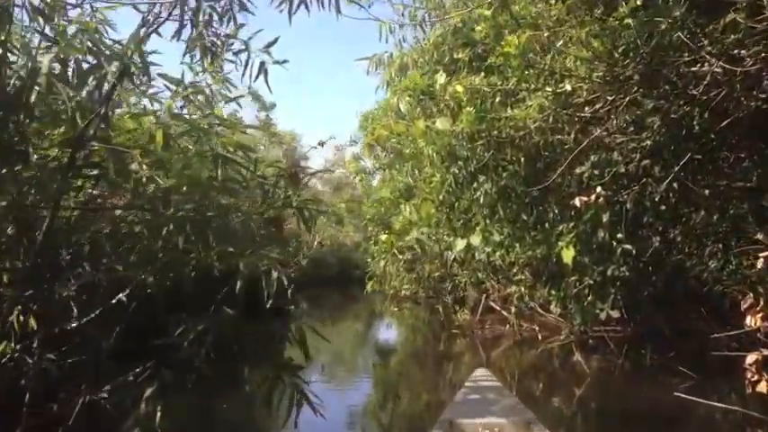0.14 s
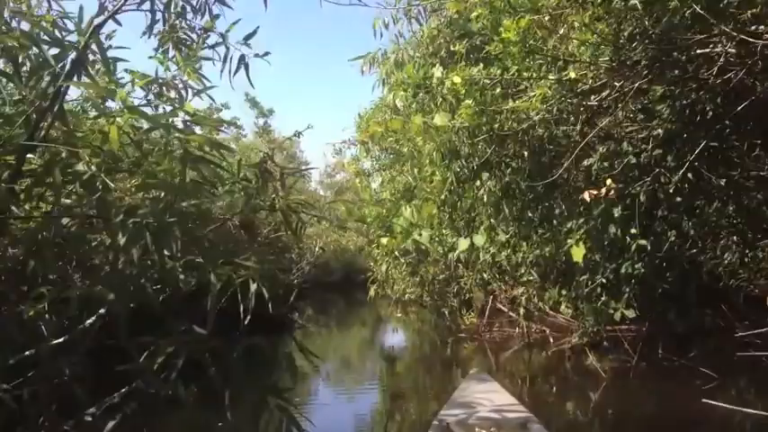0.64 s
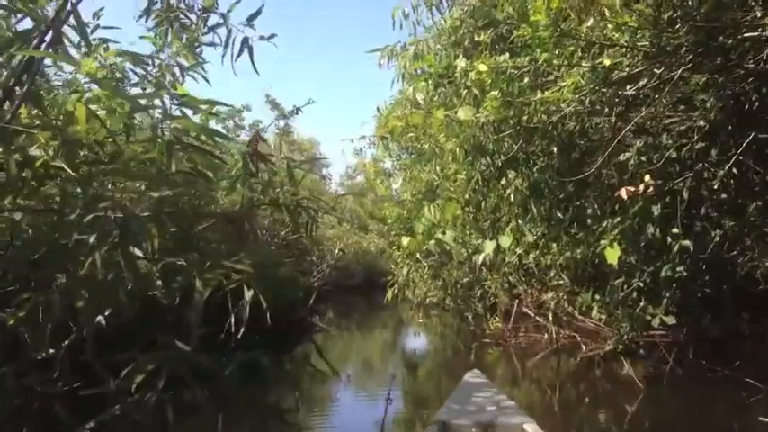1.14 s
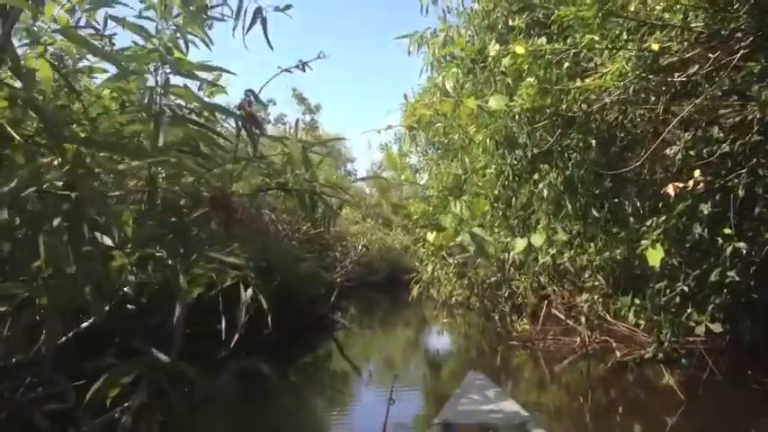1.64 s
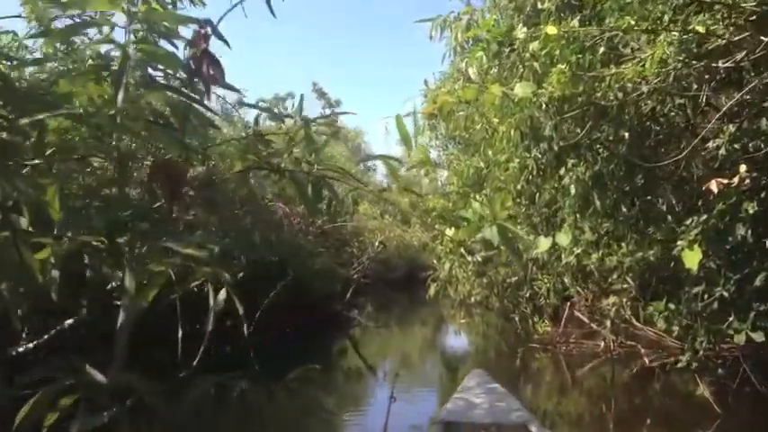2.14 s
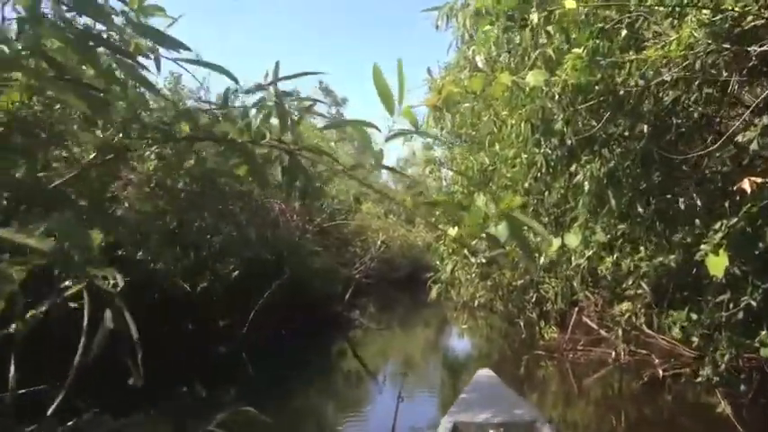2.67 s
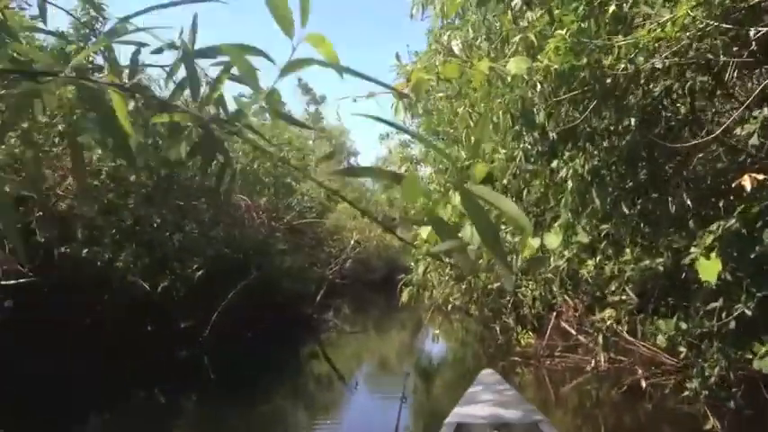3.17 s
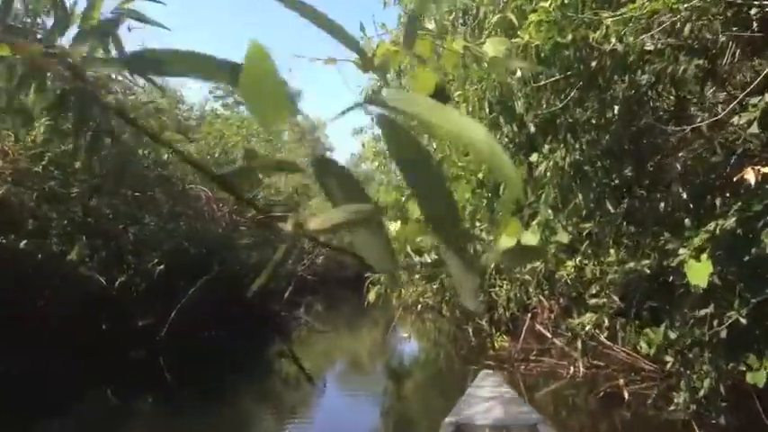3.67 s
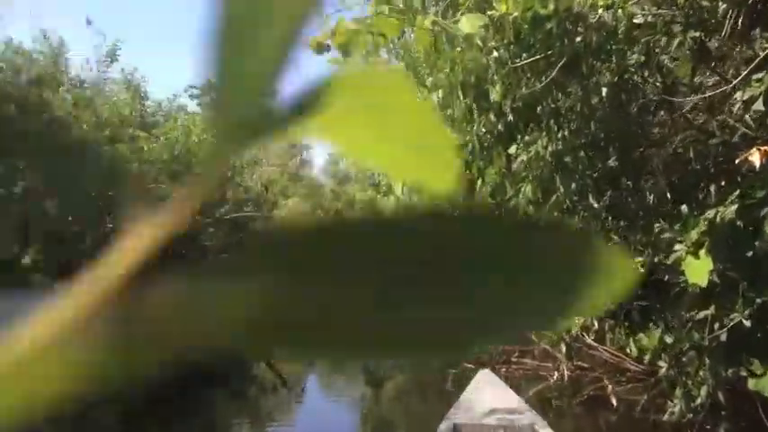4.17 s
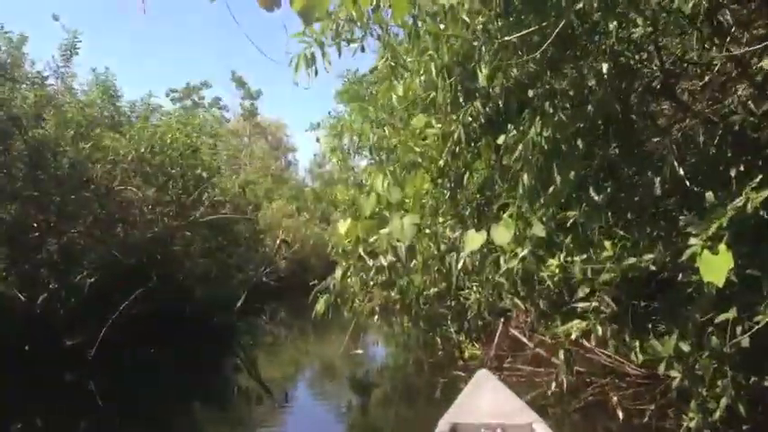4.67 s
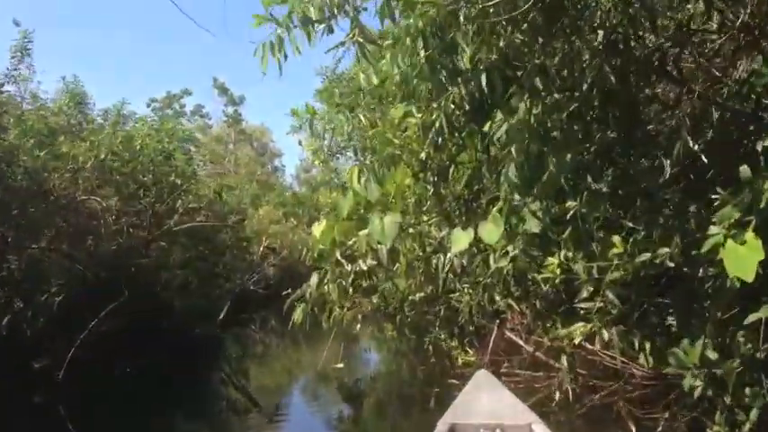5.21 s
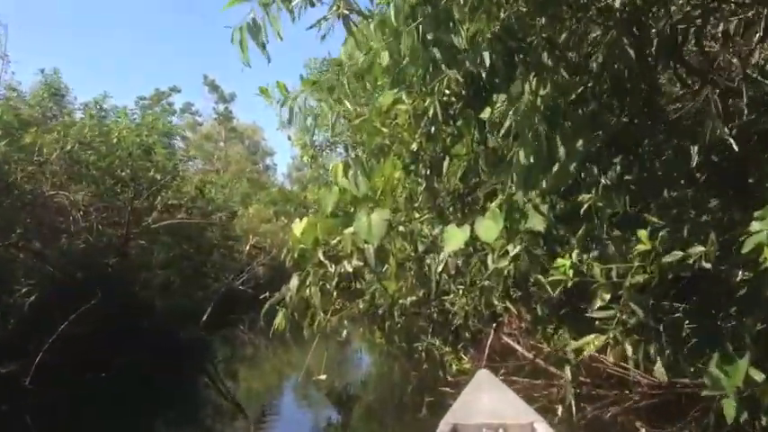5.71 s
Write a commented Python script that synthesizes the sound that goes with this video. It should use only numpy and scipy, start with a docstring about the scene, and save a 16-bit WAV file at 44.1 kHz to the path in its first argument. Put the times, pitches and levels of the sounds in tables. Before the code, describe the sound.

Quiet outdoor paddling on a calm creek, heard close through a small camera microphone with steady faint hiss and a soft low hull hum. A brief gurgle opens, then from 0.2 to 1.4 seconds short round drips and plops scatter, with tiny dry ticks and thin trickling. It calms until about 2.1, when a brighter cluster of plops and leaf ticks bursts at 2.3, followed by draining bubbles, soft hull bumps near 2.6 and fuller gurgling around 2.9. Water thins after 3.4. At 3.75 the paddle gives a hollow woody knock with a short low ring. Twigs scrape at 4.1, then at 4.33 a leafy branch slaps the camera: a very loud abrupt thump and crack with a few smaller flicks, over within 50 milliseconds. Rustling and lively plops follow at 4.5 and 4.9, a soft bump near 5, then fading trickle and light leaf brushing to the end.

```python
"""Water gurgles, trickles and drips round a canoe paddle over a low hull hum: swarms of gliding sine bubbles.
Foliage rustles along the boat and the hull hums: shaped noise, over two faint low drones.
Twigs tick and drag: noise bursts through resonances. Wooded banks return a short dull tail.
The paddle knocks the hull among softer bumps, and a leafy branch slaps the camera: damped modes and noise.
The camera adds a steady hiss."""
import sys
import numpy as np
from scipy import signal
from scipy.fft import rfft, irfft, next_fast_len
from scipy.io import wavfile
from scipy.ndimage import map_coordinates

SR = 44100
rng = np.random.default_rng(int(sys.argv[2]) if len(sys.argv) > 2 else 0)


def wav_out(sig):
    """Save sig, one row per channel (or a flat mono array), as 16-bit PCM at SR to the path in sys.argv[1]."""
    wavfile.write(sys.argv[1], SR, np.round(np.clip(np.atleast_2d(sig).T, -1, 1) * 32767).astype(np.int16))


def ratio(d):
    """dB to gain"""
    e = np.asarray(d, float) / 20
    return 10 ** e


N = 257103

# large bubbles swirling round the blade: t/s, level/dB
GURGLE_LEVEL = [(0.0, -53.5), (0.11, -80), (0.33, -69.5), (1.1, -69.5), (1.3, -80), (1.65, -68.5),
                (2.1, -81.5), (2.31, -62), (2.5, -68), (2.88, -59), (3.41, -63.5), (3.7, -73),
                (4.18, -76.5), (4.6, -56.5), (4.76, -64), (5.02, -57.5), (5.2, -72), (5.83, -71)]
# water draining off blade and hull: t/s, level/dB
TRICKLE_LEVEL = [(0.0, -72.5), (0.15, -63.5), (0.5, -69.5), (0.69, -59), (0.88, -69.5), (1.1, -59.5),
                 (1.65, -67), (2.08, -74.5), (2.31, -63), (2.53, -72.5), (2.64, -61), (2.75, -68),
                 (2.95, -55), (3.08, -63.5), (3.41, -61), (3.63, -72), (4.29, -70), (4.4, -53.5),
                 (4.73, -64.5), (4.96, -57.5), (5.2, -65.5), (5.4, -71.5), (5.83, -64.5)]
# single bubbles and drops: t/s, peak/dB, f at the peak/Hz, length/cycles
DROPS = [(0.199, -39.5, 2320, 10.7), (0.312, -50, 2400, 5.6), (0.338, -53.5, 4490, 15),
         (0.349, -38, 1790, 6.1), (0.372, -50.5, 322, 6.1), (0.373, -35.5, 1680, 4.5),
         (0.382, -41, 1350, 6.9), (0.413, -52, 7240, 12), (0.555, -53, 645, 8.5), (0.653, -38, 1150, 6.7),
         (0.724, -46.5, 1380, 8.3), (0.74, -49, 2070, 6.8), (0.757, -42.5, 2200, 6.5),
         (0.775, -50, 2720, 12), (0.803, -50, 2120, 9.6), (0.872, -50, 1830, 9.5),
         (0.994, -38.5, 2440, 7.8), (1.04, -51, 894, 18.5), (1.071, -45.5, 877, 11),
         (1.086, -44, 1270, 10.5), (1.165, -49, 1480, 9.4), (1.239, -45, 1840, 4.4), (1.28, -50, 7900, 13),
         (1.395, -48.5, 2300, 13), (2.145, -45, 5300, 12), (2.169, -48.5, 4000, 7.5),
         (2.175, -47, 2020, 11), (2.262, -43, 2200, 5.4), (2.268, -30, 1970, 3.8), (2.31, -43.5, 5630, 9.7),
         (2.339, -29, 1894, 8.4), (2.341, -37, 1386, 8.3), (2.34, -45.5, 3930, 38), (2.37, -49, 3580, 18),
         (2.391, -49, 1760, 12), (2.436, -45, 1143, 13.7), (2.538, -42.5, 3900, 9.5),
         (2.651, -32.5, 2190, 5.7), (2.67, -38.5, 1380, 6.5), (2.676, -42, 2240, 14),
         (2.691, -48, 2480, 18), (2.766, -52, 812, 14), (2.852, -46, 408, 9), (2.877, -50, 1190, 11),
         (2.897, -42.5, 2740, 8.1), (2.931, -37, 1630, 4.3), (2.971, -46.5, 3400, 9.2),
         (2.987, -50, 440, 7.4), (3.12, -47.5, 810, 7.3), (3.182, -52, 2140, 11), (3.266, -53.5, 338, 7.6),
         (3.467, -52.5, 1300, 10.6), (3.476, -54, 303, 6), (4.124, -48, 1220, 8.4),
         (4.129, -45.5, 2520, 11.5), (4.405, -45.5, 3260, 12), (4.473, -44.5, 1200, 10.7),
         (4.516, -33, 1390, 5.8), (4.527, -37, 920, 6.3), (4.545, -37, 1540, 11), (4.546, -35, 2450, 7.6),
         (4.577, -46.5, 1640, 13), (4.577, -44, 695, 14.5), (4.6, -52, 656, 12.7), (4.635, -51, 597, 12),
         (4.663, -45, 1770, 10), (4.755, -49.5, 201, 4.9), (4.864, -29.5, 1160, 3),
         (4.8645, -38, 2240, 7.2), (4.898, -44.5, 2340, 17), (4.951, -45, 1223, 10), (4.993, -48, 2520, 10),
         (5.01, -46.5, 912, 18.6), (5.025, -46, 2080, 16), (5.027, -43.5, 1250, 11), (5.051, -47, 1740, 10)]
# scattered drips: level re trickle, median pitch, its spread, median length
DRIP_DB, DRIP_HZ, DRIP_OCTAVES, DRIP_CYCLES = -6.5, 2188, 0.9, 10
# echo decay off the wooded banks: f/Hz, t60/s
BANK_DECAY = [(300, 0.037), (2000, 0.067), (10000, 0.037)]
# hum of the hull: t/s, level/dB
HUM_LEVEL = [(0.0, -55.5), (0.25, -59), (0.8, -64.5), (1.8, -65), (2.4, -59), (3.2, -62), (3.6, -67),
             (4.15, -57.5), (4.5, -63), (5.83, -63.5)]
# hum spectrum: f/Hz, density/dB
HUM_SPECTRUM = [(13, -60), (22, -27), (27, -2), (40, -9), (54, 2), (107, 0), (187, -11.5), (209, -23.5),
                (300, -22.5), (390, -46), (660, -120)]
# paddle and water bumping the hull: t/s, level/dB
KNOCKS = [(0.291, -47.5), (1.915, -52), (2.094, -47), (2.606, -42.5), (2.633, -43.5), (2.67, -44),
          (3.744, -36), (3.7496, -31.5), (3.772, -38), (3.809, -39), (3.866, -54), (4.985, -46)]
# low hull modes: f/Hz, level/dB, t60/s
HULL_MODES = [(85, 7.5, 0.043), (117.2, -4, 0.32), (175.5, -9, 0.17), (201.7, 2.5, 0.078), (319, 0, 0.078),
              (430, 6, 0.019)]
# dense upper hull modes: f/Hz, density/dB
PLANK_SPECTRUM = [(200, -20), (400, 3.5), (1000, 5), (1700, 2), (2350, 0.5), (2700, -9), (4500, -19),
                  (8000, -26), (15000, -47)]
# decay of the upper hull modes: f/Hz, t60/s
PLANK_DECAY = [(300, 0.19), (1000, 0.054), (2500, 0.11), (8000, 0.064)]
# extra hum after each bump: level re bump, decay
AFTER_HUM_DB, AFTER_HUM_T60_S = -14, 0.38
# foliage brushing along the boat: t/s, level/dB
RUSTLE_LEVEL = [(0.0, -64), (0.11, -75.5), (0.5, -74), (1.05, -68.5), (1.45, -70.5), (2.0, -75),
                (2.2, -68.5), (3.0, -68.5), (3.41, -68.5), (3.6, -76), (4.18, -75), (4.44, -58.5),
                (4.73, -69), (4.9, -61.5), (5.39, -72), (5.55, -62.5), (5.75, -77)]
# foliage spectrum: f/Hz, density/dB
BRUSH_SPECTRUM = [(500, -2), (1200, -31), (2300, -0.5), (4000, 2), (7000, -5), (11000, -10.5), (15200, -15),
                  (15500, -62)]
# steady low drone: f/Hz, width/Hz, level/dB
DRONE_TONES = [(59.3, 9, -68), (116.8, 9, -73.5)]
# twig and leaf snaps: t/s, body peak/dB, bright peak re body/dB, t60/s
SNAPS = [(.349, -40.5, -32, 0.013), (0.389, -56, -24, .005), (.412, -43, -20, 0.01),
         (.759, -39, -28, 0.0061), (.778, -51, -1, 0.011), (1.069, -40.5, -23, 0.015),
         (2.143, -50.5, 5, 0.012), (2.151, -55.5, 14.5, 0.014), (2.261, -37.5, -11, 0.04),
         (2.269, -26, 2, 0.0082), (2.342, -32.5, -21, 0.0067), (2.539, -47, 2.5, 0.011),
         (2.676, -40, -21, 0.014), (2.684, -35.5, -21, 0.0077), (2.929, -43.5, -24, 0.016),
         (3.184, -40.5, -15, 0.016), (4.124, -41, -1, 0.04), (4.28, -49.5, 8.5, .006),
         (4.458, -50, 5, 0.0073), (4.517, -35.5, -10, 0.012), (4.547, -40, -23, .01),
         (4.865, -33.5, -29, 0.013), (5.029, -42, -18, .01), (5.104, -47, -14, 0.01),
         (5.163, -44, -5.5, .006), (5.516, -49.5, -1, 0.044)]
# leaves dragged past: t/s, body level/dB, bright level re body/dB, hold/s, t60/s
DRAGS = [(2.265, -52.5, -1.5, 0.022, 0.24), (2.336, -53, -7, 0.015, 0.2), (2.688, -57, -6, 0.017, 0.05),
         (4.128, -55, -12, 0.022, 0.19), (0.361, -63.5, -31, 0.035, 0.044), (0.701, -60, -24, 0.11, 0.056),
         (1.071, -54, -23, 0.027, 0.043), (4.34, -45, -12, 0.029, 0.014), (4.405, -44.5, -19, 0.023, .02),
         (4.464, -59, -2, 0.016, .04), (4.517, -45, -16, 0.033, 0.11), (4.865, -54, -26, 0.0078, 0.16),
         (4.945, -59.5, -4, 0.019, 0.058), (4.976, -55, -8, 0.075, 0.071), (4.757, -68.5, 5.5, 0.038, 0.1),
         (5.105, -51, -26, 0.011, 0.023)]
# twig resonances: f/Hz, width/Hz, level/dB
TWIG_MODES = [(750, 590, -7.5), (1350, 860, -7.5), (2020, 390, -2.5), (3600, 3200, -16.5)]
# branch on the camera: t/s, push level/dB, port ring level/dB, crack level/dB
SLAPS = [(4.322, -36, -60, -46), (4.332, -7, -8, -22.5), (4.339, -25, -50, -44), (4.3478, -14, -36, -28),
         (4.3534, -16.5, -50, -32.5), (4.361, -30, -54, -35), (4.366, -35, -51, -40)]
# body of the camera: f/Hz, level/dB, t60/s
CASE_MODES = [(115, -2.5, 0.051), (183, 6, 0.019), (260, 4.5, 0.028), (345, 3.5, 0.027), (410, 0.5, 0.023),
              (635, -7, 0.043), (830, -6.5, 0.029)]
# microphone port: f/Hz, level/dB, t60 ahead of the swell factor/s
PORT_MODES = [(2030, 2, 0.0085), (3200, -4, 0.0039)]
# crack of the slap: f/Hz, density/dB
CRACK_SPECTRUM = [(500, 1.5), (1300, 5), (3000, 2), (5800, -4), (8000, -10.5), (15000, -16), (17000, -42)]
# camera hiss: f/Hz, density/dB
HISS_SPECTRUM = [(120, -21), (200, 6.5), (304, -8.5), (487, 2.5), (1400, -5.5), (2100, -7.5), (3000, -12),
                 (7000, -11.5), (14200, -13), (15200, -12), (15500, -74)]
HISS_DB = -66


def unit(x):
    """Scaled to rms 1."""
    return x / np.sqrt(np.mean(x ** 2) + 1e-20)


def along(points, hz):
    """Interpolates (f/Hz, value) points on a log-frequency axis."""
    f, v = np.transpose(points)
    return np.interp(np.log(hz + 1), np.log(f + 1), v)


def curve(points):
    """Interpolates (t/s, value) points to one value per sample."""
    s, v = np.transpose(points)
    return np.interp(np.arange(N) / SR, s, v)


def wobble(rate_hz):
    """Smooth random curve with rate_hz knots a second."""
    knots = rng.standard_normal(int(N * rate_hz / SR) + 4)
    return map_coordinates(knots, [np.arange(N) * rate_hz / SR])


def filtered(x, response):
    """x times a complex response of frequency."""
    m = next_fast_len(len(x) + 8192)
    return irfft(rfft(x, m) * response(np.fft.rfftfreq(m, 1 / SR)), m)[:len(x)]


def shaped(x, spectrum):
    """x coloured by a (f/Hz, dB) curve."""
    return filtered(x, lambda hz: ratio(along(spectrum, hz)))


def noise(spectrum):
    """Coloured noise of rms 1."""
    return unit(shaped(rng.standard_normal(N), spectrum))


def add(track, s, sound):
    """Mixes a sound into the track at s seconds."""
    part = track[round(s * SR):][:len(sound)]
    part += sound[:len(part)]


def ring(modes, t, scatter_db):
    """Damped sine modes, each struck at a slightly random level."""
    out = 0
    for hz, db, t60 in modes:
        level_db = db + scatter_db * rng.normal() - 60 * t / t60
        out = out + ratio(level_db) * np.sin(2 * np.pi * hz * t)
    return out


def dying(decays, size):
    """Noise burst whose bands fade at their own speed, energy 1."""
    hz, t, z = signal.stft(rng.standard_normal(size), SR, nperseg=128)
    fade = ratio(-60 * t / along(decays, hz)[:, None])
    tail = signal.istft(z * fade, SR, nperseg=128)[1]
    return tail / np.linalg.norm(tail)


def bubbles(s, db, hz, cycles, rise, size):
    """Air pockets: soft start, quick death, pitch climbing as they near the surface."""
    t = np.arange(size) / SR
    u = 2.38 * t * (hz / cycles)[:, None]  # envelope peaks at u = 1
    turns = hz[:, None] * t * (1 + rise * (u / 2 - 1))
    envelope = (u * np.exp(1 - u)) ** 1.44
    rows = ratio(db)[:, None] * envelope * np.sin(2 * np.pi * turns)
    at = np.round(s * SR).astype(int)[:, None] + np.arange(size)
    return np.bincount(at.ravel(), rows.ravel(), N + size + SR)[:N]


def swarm(centre_hz, octaves, cycles, spread_db, count, size):
    """Many bubbles of random time, pitch, length and level, rms 1."""
    s = rng.random(count) * N / SR
    hz = centre_hz * 2 ** (octaves * rng.normal(size=count))
    life = cycles * 1.3 ** rng.normal(size=count)
    db = spread_db * np.minimum(rng.exponential(size=count), 3)
    return unit(bubbles(s, db, hz, life, 0.056, size))


def drops_and_spray():
    """Single drops, each breaking into four weaker pockets of nearby pitch just after it."""
    s, db, hz, cycles = np.transpose(DROPS)
    drops = bubbles(s, db, hz, cycles, 0.016, size=4000)
    later, apart, weaker = rng.random((3, len(s), 4))
    spray_s = s[:, None] + 1.5 * later * (cycles / hz)[:, None]
    spray_db = db[:, None] - 7.5 - 8 * weaker
    spray_hz = hz[:, None] * 2 ** (0.82 * apart - 0.35)
    spray_cycles = np.repeat(0.5 * cycles, 4)
    spray = bubbles(spray_s.ravel(), spray_db.ravel(), spray_hz.ravel(), spray_cycles, 0.027, size=2500)
    return drops + spray


def water(gurgle_db, trickle_db):
    """Large bubbles at the blade, small ones where it drains, scattered drips and single drops."""
    gurgle = ratio(gurgle_db) * swarm(520.6, 0.449, 5.96, 1.86, count=2500, size=1800)
    trickle = ratio(trickle_db + 3.17 * wobble(45)) * swarm(1692, 0.558, 6.5, 3.2, count=7000, size=600)
    drips = swarm(DRIP_HZ, DRIP_OCTAVES, DRIP_CYCLES, 3.2, count=200, size=2500)
    return gurgle + trickle + ratio(trickle_db + DRIP_DB) * drips + drops_and_spray()


def banks(x):
    """Wooded banks answer with a short dull tail, 200 samples late."""
    return signal.fftconvolve(np.pad(x, (200, 0)), dying(BANK_DECAY, size=10000))[:N]


def hull(hum_db):
    """The shell hums with the water under it, booms when bumped and cracks when knocked hard."""
    boom, crack, after_hum = np.zeros((3, N))
    t = np.arange(SR // 3) / SR
    for s, db in KNOCKS:
        soft = np.clip((-30.5 - db) / 15, 0, 1)  # gentle bumps favour the low modes
        modes = [(hz, level - soft * 7 * np.log2(hz / 85), t60) for hz, level, t60 in HULL_MODES]
        add(boom, s, ratio(db) * ring(modes, t, 1) * (1 - np.exp(-t / 0.0033)))
        after_db = db + AFTER_HUM_DB - 60 * t / AFTER_HUM_T60_S
        add(after_hum, s, ratio(after_db) * (1 - np.exp(-t / 0.03)))
        add(crack, s, ratio(db + 36 - 61 * soft) * dying(PLANK_DECAY, size=6000))
    hum = (ratio(hum_db) + after_hum) * ratio(3.5 * wobble(12)) * noise(HUM_SPECTRUM)
    return boom + shaped(crack, PLANK_SPECTRUM) + hum


def leaves(rustle_db):
    """Foliage rustles: random tiny contacts over a soft hiss of the same colour."""
    contacts = rng.standard_normal(N) * (rng.random(N) < 0.05)
    contacts = contacts * ratio(2.8 * rng.exponential(size=N))
    grains = unit(shaped(contacts, BRUSH_SPECTRUM))
    return ratio(rustle_db + 2.34 * wobble(30)) * unit(noise(BRUSH_SPECTRUM) + 0.55 * grains)


def drone():
    """Two steady low tones, fuzzy because each is narrow-band noise."""
    out = np.zeros(N)
    for hz, width, db in DRONE_TONES:
        band = filtered(rng.standard_normal(N), lambda f: 1 / (1 + (2 * (f - hz) / width) ** 2))
        out += ratio(db) * unit(band)
    return out


def twig_body(f):
    """Response of a twig: resonances of alternating sign under a 4500 Hz low-pass."""
    out = 0
    for k, (hz, width, db) in enumerate(TWIG_MODES):
        out = out + (-1) ** k * ratio(db) * 1j * f * width / (hz ** 2 - f ** 2 + 1j * f * width)
    return out * 4500 / (4500 + 1j * f)


def bright_edge(f):
    """Response of the crackle: a broad treble band."""
    return (1j * f / (4000 + 1j * f)) ** 3 * (7000 / (7000 + 1j * f)) ** 4


def snaps():
    """Ticks: decaying noise excites the twig resonances and a bright crackle."""
    out, t = np.zeros(N), np.arange(SR // 5) / SR
    for s, db, bright_db, t60 in SNAPS:
        a, b = rng.standard_normal((2, len(t))) * ratio(-60 * t / np.clip(t60, 0.002, 0.1))
        body, bright = filtered(a, twig_body), filtered(b, bright_edge)
        body, bright = body / np.abs(body).max(), bright / np.abs(bright).max()
        add(out, s, ratio(db) * (body + ratio(bright_db) * bright))
    return out


def drags():
    """Leaves dragged past: stuttering noise through the same twig body and crackle, held then fading."""
    out, t = np.zeros(N), np.arange(SR // 5) / SR
    for s, db, bright_db, hold, t60 in DRAGS:
        fade = ratio(db - 60 * np.maximum(t - hold, 0) / np.clip(t60, 0.005, 0.3))
        fade = fade * (1 - np.exp(-t / 0.0025))
        stutter = ratio(2.2 * wobble(198)[:len(t)])  # contacts come and go within milliseconds
        a, b = rng.standard_normal((2, len(t))) * stutter
        body, bright = unit(filtered(a, twig_body)), unit(filtered(b, bright_edge))
        add(out, s, fade * (body + ratio(bright_db) * bright))
    return out


def slaps():
    """Each leaf presses the microphone inward, thumps the case, rings the port and cracks."""
    out, crack = np.zeros((2, N))
    t = np.arange(SR // 8) / SR
    swell = t / 0.0013 * np.exp(1 - t / 0.00091) * ratio(60 * t / 0.032)  # over a few cycles
    for s, push_db, port_db, crack_db in SLAPS:
        thump = -0.4 * ring(CASE_MODES, t, 1.0) * (1 - np.exp(-t / 0.001))
        port = ring(PORT_MODES, t, 0.4) * swell
        add(out, s, ratio(push_db) * thump + ratio(port_db) * port)
        add(crack, s, ratio(crack_db + 6.5 - 60 * t / 0.016) * rng.standard_normal(len(t)))
    return out + shaped(crack, CRACK_SPECTRUM)


def scene():
    """Water and twigs echo off the banks; hull, foliage, drone and slaps add directly."""
    near = water(curve(GURGLE_LEVEL), curve(TRICKLE_LEVEL)) + snaps() + drags()
    echo = ratio(-13.5) * banks(near)
    direct = hull(curve(HUM_LEVEL)) + leaves(curve(RUSTLE_LEVEL)) + drone() + slaps()
    return (near + echo + direct)[None]


def low_pass(x):
    """Removes everything above the highest recorded frequency."""
    return signal.sosfilt(signal.butter(12, 16490, fs=SR, output="sos"), x)


def record(dry):
    """The small microphone loses deep bass below 35 Hz; the camera adds a soft hiss."""
    thinned = filtered(dry[0], lambda hz: (1j * hz / (35 + 1j * hz)) ** 2)[None]
    mix = thinned + ratio(HISS_DB) * noise(HISS_SPECTRUM)
    return low_pass(mix)


dry = scene()
out = record(dry)
wav_out(out)
```